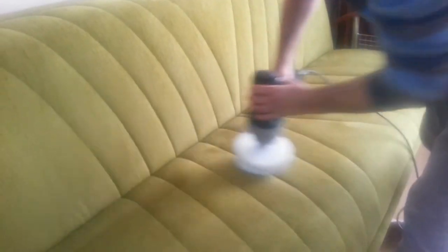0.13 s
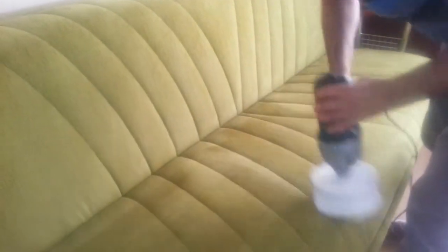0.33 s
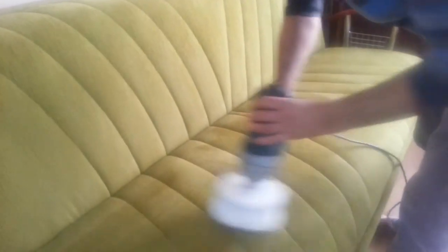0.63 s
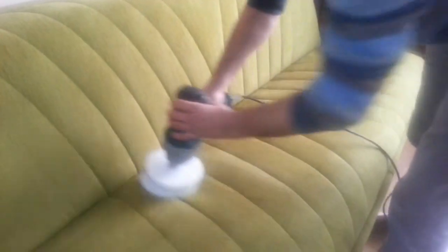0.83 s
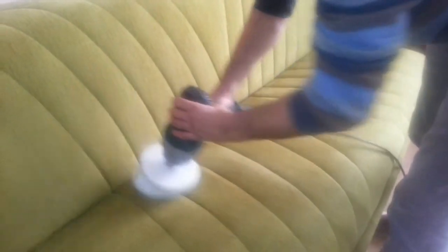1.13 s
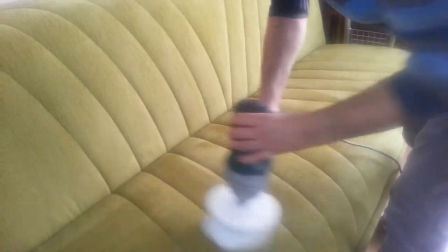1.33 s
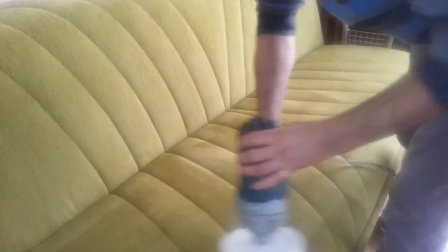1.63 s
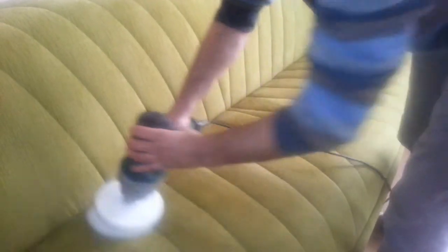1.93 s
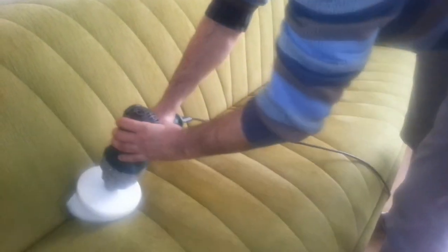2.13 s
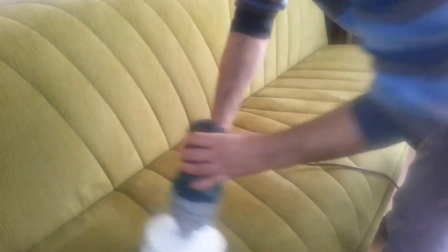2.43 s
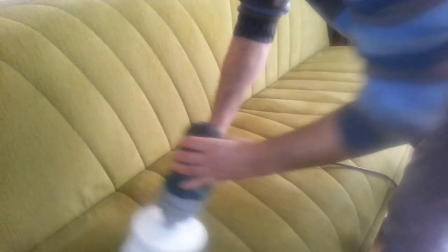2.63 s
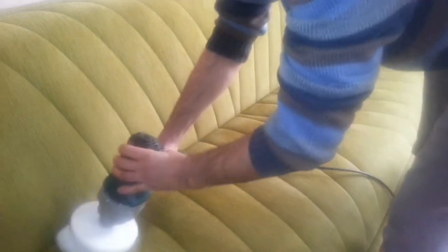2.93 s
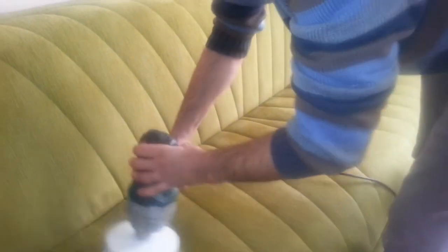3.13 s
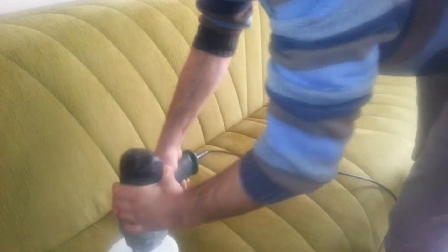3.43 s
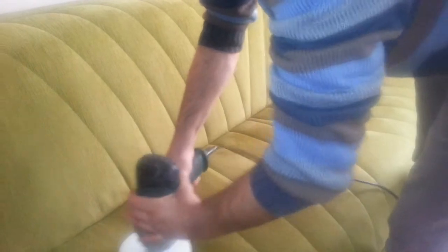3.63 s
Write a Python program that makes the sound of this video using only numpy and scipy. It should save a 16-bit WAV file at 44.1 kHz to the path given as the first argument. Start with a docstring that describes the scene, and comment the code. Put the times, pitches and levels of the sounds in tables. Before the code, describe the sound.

Loud electric brush motor whining and hissing close up as its bristles scrub sofa upholstery

```python
"""A wavering fan whine and hissing air lead, over motor hum, gear buzz and the scrub of a brush on a sofa.
From one second on, lumps of low rumble join in, and the low edge of the roar drops out briefly.
A handheld rotary brush machine is swept about close to a pair of microphones in a room. Whine, hum and buzz
are sines locked to one motor turn; scrub, air and rumble are filtered noise.
The moving machine makes its tones fade apart in each ear."""
import sys
import numpy as np
from scipy import signal
from scipy.fft import next_fast_len
from scipy.io import wavfile
from scipy.ndimage import uniform_filter1d, map_coordinates

SR = 44100
rng = np.random.default_rng(int(sys.argv[2]) if len(sys.argv) > 2 else 0)


def waveform_to_disk(signal):
    """Save audio, clipped to [-1, 1], as 16-bit WAV at the path in sys.argv[1]."""
    frames = np.transpose(np.atleast_2d(signal))
    scaled = np.clip(frames, -1, 1) * 32767
    samples = np.round(scaled).astype(np.int16)
    wavfile.write(sys.argv[1], SR, samples)


def gain_from_db(level_db):
    """Turn a decibel level (scalar or array-like) into a linear amplitude factor."""
    decades = np.asarray(level_db, float) / 20
    return 10 ** decades


N = 166257  # length in samples


def unit_rms(x):
    """Scale each channel to unit rms."""
    return x / np.sqrt(np.mean(x ** 2, axis=-1, keepdims=True) + 1e-20)


def in_time(rows):
    """Draw each table column after t/s as a straight-line curve, one value per sample."""
    times, *columns = np.transpose(rows)
    return [np.interp(np.arange(N) / SR, times, column) for column in columns]


def sides(db, pan_db):
    """Left and right gains from a level and a left-minus-right difference."""
    return gain_from_db(db + np.outer([.5, -.5], pan_db))


def drift(rate_hz, count=1):
    """Slow random wander of unit rms: noise through two equal one-pole low-passes, made at SR / 40."""
    pole = np.exp(-80 * np.pi * rate_hz / SR)
    noise = rng.standard_normal((count, N // 40 + 2002))
    slow = signal.lfilter([1], [1, -2 * pole, pole * pole], noise)[:, 2000:]  # settled part only
    return np.array([np.interp(np.arange(N) / 40, np.arange(len(s)), s) for s in unit_rms(slow)])


def bump(centre_s, length_s):
    """A smooth cosine-squared rise and fall around a moment."""
    return np.cos(np.pi * np.clip((np.arange(N) / SR - centre_s) / length_s, -.5, .5)) ** 2


# speed of the motor, given as the pitch of its twelve-bladed fan: (t/s, f/Hz)
SPEED = [(0, 4952), (.3, 4940), (.45, 4985), (.6, 5000), (.77, 5037), (.85, 5028), (1, 4965), (1.13, 4922),
         (1.26, 4948), (1.41, 4925), (1.55, 4935), (1.75, 4985), (1.92, 5014), (2.08, 4960), (2.2, 4895),
         (2.28, 4885), (2.4, 4912), (2.62, 4927), (2.74, 4922), (2.89, 4850), (3.02, 4795), (3.2, 4773),
         (3.34, 4722), (3.47, 4670), (3.61, 4652), (3.77, 4618)]


def motor_turns():
    """Running count of motor turns; the blades pass twelve times a turn."""
    fan_blades = 12
    return np.cumsum(in_time(SPEED)[0]) / fan_blades / SR


# wall echoes of the tones: (left delay t/s, right delay t/s, level/dB)
ECHOES = [(.047, .055, -15), (.088, .079, -10)]
# the tones' timing offset between the two ears wanders: (t/s, difference/microseconds)
EAR_OFFSET = [(0, 45), (.28, 70), (.6, 25), (1, 22), (1.6, 45), (2, 25), (2.25, 85), (2.42, 10), (2.8, 10),
              (3.15, 58), (3.5, 15), (3.72, 95)]


def tones(orders, levels, turns, fade_share, slowest_s):
    """Sines locked to the motor turn; echoes lag in pitch during glides and beat, differently in each ear."""
    out, now = 0, np.arange(N)
    ahead = turns - turns[0] * now  # departure from a steady turn
    turns_per_s = np.gradient(turns) * SR
    ear_turns = turns_per_s * in_time(EAR_OFFSET)[0] / 1e6 * [[.5], [-.5]]
    for multiple, db in zip(orders, levels):
        wander = drift(18, count=4)
        wander = unit_rms(wander - uniform_filter1d(wander, int(slowest_s * SR)))
        # a steady path plus a wandering one, complex so that phase and level both move
        path = 1 + fade_share * (wander[:2] + 1j * wander[2:])
        for *lags, echo_db in ECHOES:
            behind = np.array([np.interp(now - lag * SR, now, ahead) - ahead for lag in lags])
            echo_turns = multiple * behind + rng.random((2, 1))
            path = path + gain_from_db(echo_db) * np.exp(2j * np.pi * echo_turns)
        path = path / np.sqrt(np.mean(np.abs(path) ** 2, axis=1, keepdims=True))
        tone = np.exp(2j * np.pi * (multiple * (turns + ear_turns) + rng.random()))
        out = out + gain_from_db(np.array(db))[:, None] * path * tone
    return out.real


# fan whine as the vents turn about: (t/s, left level/dB, right level/dB)
WHINE = [(0, -21, -16), (.05, -18, -18), (.15, -18, -19), (.3, -15, -17), (.5, -15, -20), (.6, -18, -18),
         (.75, -13, -18), (.85, -17, -20), (1, -14, -18), (1.15, -12, -20), (1.3, -14, -17),
         (1.43, -12, -17), (1.53, -16, -21), (1.66, -28, -27), (1.78, -20, -20), (1.9, -13, -21),
         (2.05, -13, -22), (2.12, -14, -15), (2.2, -10, -13), (2.35, -11, -25), (2.45, -12, -20),
         (2.53, -16, -15), (2.65, -15, -17), (2.75, -18, -18), (2.83, -11, -22), (2.95, -15, -26),
         (3.03, -24, -23), (3.13, -18, -25), (3.23, -12, -21), (3.31, -20, -24), (3.42, -12, -20),
         (3.5, -14, -21), (3.6, -10, -23), (3.7, -21, -17), (3.77, -19, -17)]
# pitch of each whine tone: (multiple of the motor turn)
FAN_ORDERS = (12, 11.935, 23.13, 24.02)
# level of each whine tone: (left level/dB, right level/dB)
FAN_TONES = [(-3, -3), (-19, -15.5), (-32, -22), (-33, -14)]


def fan_whine(turns):
    """Whine at and near the blade-passing rate and its double."""
    return gain_from_db(np.array(in_time(WHINE))) * tones(FAN_ORDERS, FAN_TONES, turns, fade_share=.33, slowest_s=.09)


# shaft hum, louder when the housing is pressed down: (t/s, level/dB)
HUM = [(0.0, -33.5), (0.25, -34.5), (0.41, -46), (0.98, -39), (1.32, -46), (1.77, -39), (2.03, -46.5),
       (2.07, -38.5), (2.37, -48.5), (2.67, -39.5), (2.72, -44.5), (2.94, -31.5), (3.04, -37.5),
       (3.7, -30.5), (3.77, -36)]
# pitch of each hum tone: (multiple of the motor turn)
HUM_ORDERS = (1, .89, 2, 2.76, 5.52)
# level of each hum tone: (left level/dB, right level/dB)
HUM_TONES = [(2, -1), (-5, -8), (-10, -14), (-7, -5), (-9, -10)]


def shaft_hum(turns):
    """Hum of the shaft at its turning rate, with one tone just below and others two to five and a half
    times higher."""
    return gain_from_db(in_time(HUM)[0]) * tones(HUM_ORDERS, HUM_TONES, turns, fade_share=.42, slowest_s=.2)


# gear mesh under load: (t/s, mesh tone level/dB, overtone level/dB)
GEAR = [(0, -44, -50), (1.4, -36, -48), (1.7, -30, -50), (2.2, -38, -43), (2.9, -37, -46), (3.06, -27, -44),
        (3.17, -29, -38), (3.23, -38, -25), (3.36, -34, -27), (3.43, -28, -32), (3.55, -37, -42),
        (3.69, -27, -42), (3.77, -32, -42)]
# pitch of the mesh tone and of its overtones: (multiple of the motor turn)
MESH_ORDERS = (7,)
GEAR_ORDERS = (14, 21, 35)
# level of the mesh tone and of each overtone: (left level/dB, right level/dB)
MESH_TONES = [(0, -0.54)]
GEAR_TONES = [(1, -5), (-21, -21), (-16, -19)]


def gear_buzz(turns):
    """Seven pinion teeth mesh per motor turn, with overtones at whole multiples of that rate."""
    mesh_db, overtone_db = in_time(GEAR)
    mesh = tones(MESH_ORDERS, MESH_TONES, turns, fade_share=.42, slowest_s=.2)
    overtones = tones(GEAR_ORDERS, GEAR_TONES, turns, fade_share=.33, slowest_s=.09)
    return gain_from_db(mesh_db) * mesh + gain_from_db(overtone_db) * overtones


def motor():
    """Fan, shaft and gears, all on one speed."""
    turns = motor_turns()
    return fan_whine(turns) + shaft_hum(turns) + gear_buzz(turns)


# how alike the noise is in the two ears: (f/Hz, left-right likeness, 1 = the same)
LIKENESS = [(60, .8), (250, 0.95), (500, 0.58), (1000, 0.65), (2000, 0.54), (4000, 0.22), (8000, 0.022),
            (14000, 0.091)]


def banded(white, colour, gust):
    """Fifth-octave noise bands with their own colour, flicker and left-right likeness, at unit rms."""
    gust_db, flicker_db, flicker_hz = .75, 1.25, 7.4
    out, edges = 0, 63 * 2 ** np.arange(1, 8.1, 1 / 5)
    points, like = np.array(colour, float), np.array(LIKENESS)
    for k, (low, high) in enumerate(zip(edges, edges[1:])):
        log_hz = np.log(low * high) / 2  # band centre
        db = [[np.interp(log_hz, np.log(points[:, 0]), points[:, ear])] for ear in (1, 2)]
        if max(db)[0] < -45:  # too faint to matter
            continue
        band = signal.butter(2, [low, high], "band", fs=SR, output="sos")
        mid, side = signal.sosfilt(band, white[k % 2])  # neighbouring bands use separate noises
        alike = np.clip(np.interp(log_hz, np.log(like[:, 0]), like[:, 1]), -1, 1)
        gain = gain_from_db(np.array(db) + gust_db * gust + flicker_db * drift(flicker_hz))
        out = out + gain * (np.sqrt(1 + alike) * mid + np.sqrt(1 - alike) * side * [[1], [-1]])
    return unit_rms(out)


# brush on the fabric: (t/s, level/dB, left minus right level/dB)
SCRUB = [(0.0, -24.5, 5.5), (0.16, -20.5, 6), (0.31, -22.5, 6), (0.6, -22, 9), (1.01, -23.5, 5.5),
         (1.52, -23, 8), (1.64, -21.5, 7.5), (2.31, -24.5, 5.5), (2.55, -22.5, 8), (2.97, -24, 7),
         (3.16, -22.5, 5.5), (3.22, -26.5, 8), (3.33, -23, 7), (3.61, -25, 5), (3.69, -17.5, 5.5),
         (3.74, -26.5, 7.5), (3.77, -19.5, 1)]
# colour of the dull scrub: (f/Hz, left level/dB per Hz, right level/dB per Hz)
SCRUB_COLOUR = [(60.5, -56, -56), (199, -26, -17), (265, -15, -16), (500, -15, -13.5), (810, -7.5, -10),
                (1170, -3, -6), (1890, -0.5, -9.5), (2210, -1, -6.5), (3200, -22, -9), (15000, -44, -60)]
# brighter rasp of the bristles: (t/s, level/dB)
RASP = [(0.0, -21.5), (0.1, -19), (0.22, -18.5), (0.38, -21.5), (0.56, -19), (1.16, -24.5), (1.27, -20.5),
        (1.57, -21.5), (1.62, -18.5), (1.69, -20), (1.86, -23.5), (2.42, -24.5), (2.49, -22), (3.12, -23),
        (3.25, -26), (3.6, -27.5), (3.68, -20.5), (3.77, -28)]
# colour of the rasp: (f/Hz, left level/dB per Hz, right level/dB per Hz)
RASP_COLOUR = [(60.12, -63, -66), (1495, -9.5, -29), (2190, -3, -2), (2520, -1, 3), (3140, -6.5, 0),
               (4160, -11.5, -3.5), (6000, -14, -28), (15000, -60, -60)]


def brush(gust):
    """Dense bristle flicks over a rubbing noise, coloured as a dull scrub and a bright rasp."""
    flicks_per_s, flick_share, rasp_pan_db = 2500, .39, 6.5
    shape = (2, 2, N)  # two pairs of mid and side
    flicks = unit_rms((rng.random(shape) < flicks_per_s / SR) * rng.standard_normal(shape))
    rub = flick_share * flicks + (1 - flick_share) * rng.standard_normal(shape)
    scrub = sides(*in_time(SCRUB)) * banded(rub, SCRUB_COLOUR, gust)
    rasp = banded(rub[::-1], RASP_COLOUR, gust)  # each band takes the other noise pair
    rasp = rasp * gain_from_db([[rasp_pan_db / 2], [-rasp_pan_db / 2]])
    return scrub + gain_from_db(in_time(RASP)[0]) * rasp


# air blown by the fan: (t/s, level/dB, left minus right level/dB)
AIR = [(0.0, -20, -4.0), (0.17, -18, -5), (0.29, -21.5, -6), (0.43, -18, -3.5), (0.68, -21, -3.5),
       (0.76, -17.5, -3.5), (0.83, -20, -2.5), (1.64, -19, -3), (2.0, -18.5, -1.5), (2.81, -19, -1),
       (3.24, -18, -1.5), (3.34, -20, -0.5), (3.77, -19.5, -2)]
# colour of the air: (f/Hz, left level/dB per Hz, right level/dB per Hz)
AIR_COLOUR = [(60, -73, -70), (2000, -24.5, -21), (4000, -17.5, -9), (5020, -2.5, -8.5), (6000, 2, -8),
              (6800, -5, 2), (7600, -7.5, -3.5), (9140, -10.5, -11.5), (12400, -18.5, -16.5),
              (15100, -27, -40)]


def air(gust):
    """Turbulent hiss from the vents, as coloured noise."""
    return sides(*in_time(AIR)) * banded(rng.standard_normal((2, 2, N)), AIR_COLOUR, gust)


# short lumps of low rumble: (centre t/s, peak level/dB)
RUMBLE = [(1, -54), (1.06, -43), (1.12, -44), (1.2, -46.5), (1.38, -48), (1.69, -41.5), (2.17, -42.5),
          (2.21, -42), (2.69, -49.5), (2.94, -48), (3, -52), (3.13, -44.5), (3.23, -42), (3.33, -39),
          (3.4, -42), (3.46, -43), (3.52, -43), (3.57, -42), (3.67, -40), (3.72, -47), (3.77, -45)]


def rumble():
    """Evened noise in a low resonance, nearly alike in both ears, let through in lumps."""
    centre_hz, width_hz, lump_s = 170, 55, .078
    b, a = signal.iirpeak(centre_hz, centre_hz / width_hz, SR)
    band = signal.lfilter(b, a, signal.lfilter(b, a, rng.standard_normal((2, N))))
    analytic = signal.hilbert(band, next_fast_len(N))[:, :N]
    # keeping only the phase evens out the level
    mid, side = signal.lfilter(b, a, np.cos(np.angle(analytic)))
    lumps = sum(gain_from_db(db) * bump(s, lump_s) for s, db in RUMBLE)
    return lumps * gain_from_db(-4.5) * unit_rms(mid + 0.22 * side * [[1], [-1]])


# the low edge of the roar drops out briefly: (centre t/s, length t/s)
BASS_GAPS = [(1.36, .07), (1.87, .05), (1.99, .07), (2.52, .06), (2.59, .04), (2.71, .04), (3.24, .1),
             (3.39, .07), (3.6, .08)]


def bass_gaps(x):
    """Takes the lowest part away during each drop-out; a narrower edge comes and goes at random."""
    gap_below_hz, edge_hz, edge_rate_hz, edge_bias = 356, 245, 7, .5
    low, edge = (signal.sosfiltfilt(signal.butter(8, hz, fs=SR, output="sos"), x)
                 for hz in (gap_below_hz, edge_hz))
    out = np.minimum(1, 2 * sum(bump(*row) for row in BASS_GAPS))
    edge_out = np.clip(2 * drift(edge_rate_hz) + edge_bias, 0, 1)
    return x - low * out - edge * (1 - out) * edge_out


# delay of brush and air in the left ear, later as the brush sweeps to the right: (t/s, delay/samples)
LEFT_LAG = [(0, 2), (.4, -2), (1.1, 6), (1.6, 0), (2.15, 7), (2.65, 4), (3.2, 7), (3.77, 6)]


def scene():
    """The small machine radiates no bass; scrub and air share gusts, and their ear delay follows the sweep."""
    gust = drift(21.4)
    small_body = signal.cheby2(10, 60, 161, "high", fs=SR, output="sos")  # stopband below 161 Hz
    left, right = brush(gust) + air(gust)
    left = map_coordinates(left, [np.arange(N) - in_time(LEFT_LAG)[0]], order=3, mode="mirror")
    machine = signal.sosfilt(small_body, motor() + [left, right])
    return gain_from_db(3.0) * (bass_gaps(machine) + rumble())


def top_cut(x):
    """Nothing passes above the cut-off."""
    return signal.sosfilt(signal.butter(12, 14560, fs=SR, output="sos"), x)


def record(dry):
    """The highest peaks are rounded off below a ceiling, then the bass is cut."""
    ceiling, knee, low_cut_hz = 1, 6, 94
    rounded = dry / (1 + np.abs(dry / ceiling) ** knee) ** (1 / knee)
    low_cut = signal.butter(4, low_cut_hz, "high", fs=SR, output="sos")
    mix = signal.sosfilt(low_cut, rounded)
    return top_cut(mix)


dry = scene()
out = record(dry)
waveform_to_disk(out)
```